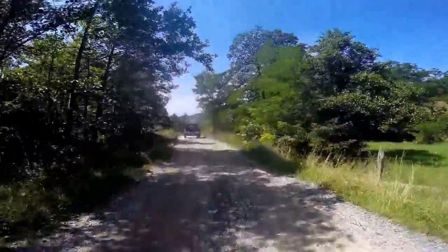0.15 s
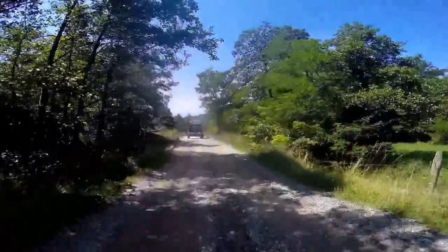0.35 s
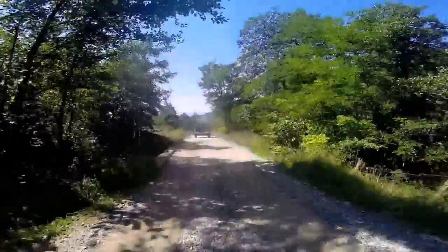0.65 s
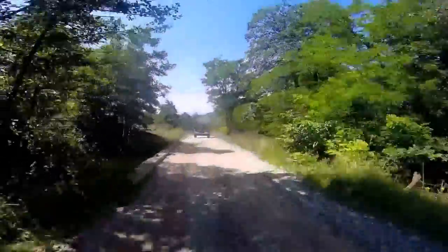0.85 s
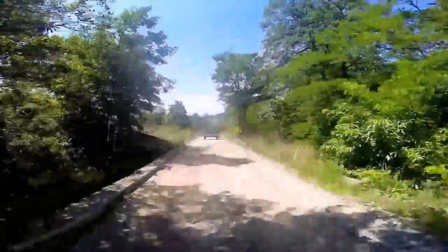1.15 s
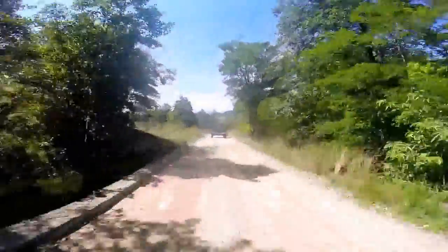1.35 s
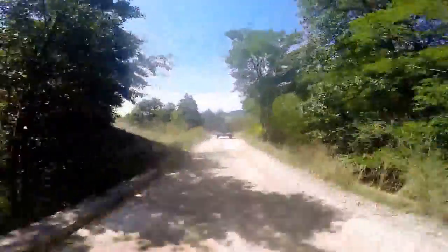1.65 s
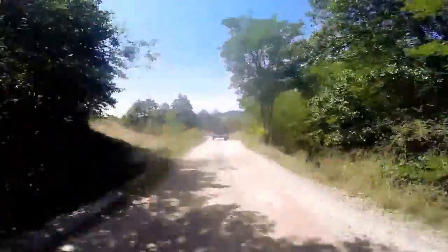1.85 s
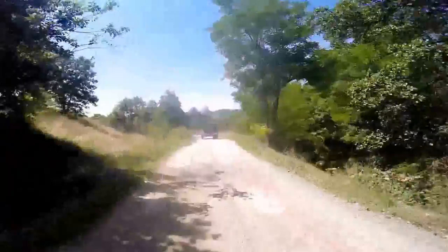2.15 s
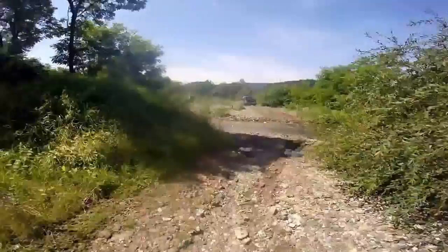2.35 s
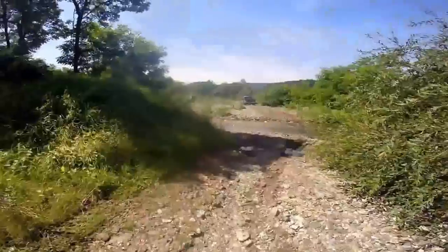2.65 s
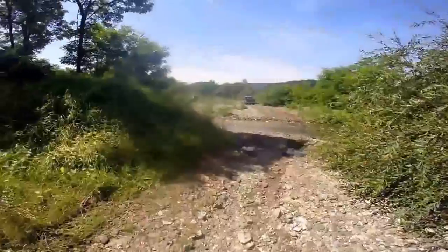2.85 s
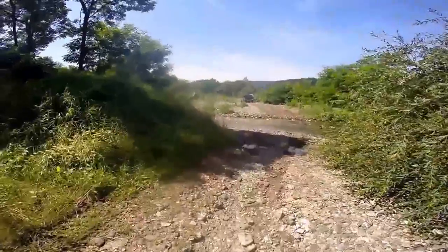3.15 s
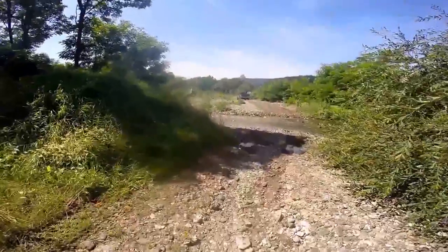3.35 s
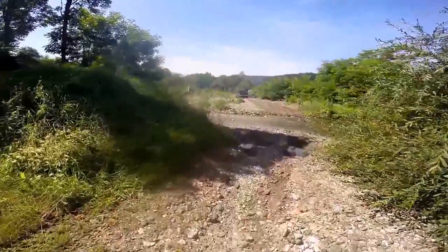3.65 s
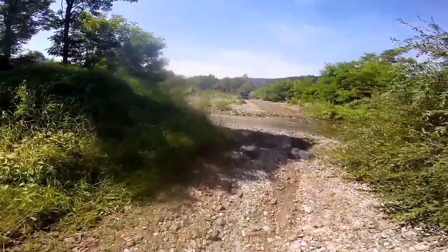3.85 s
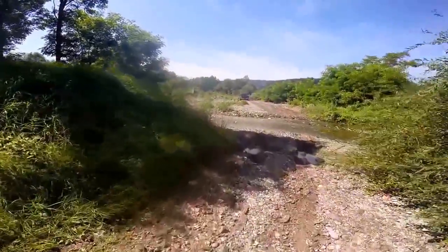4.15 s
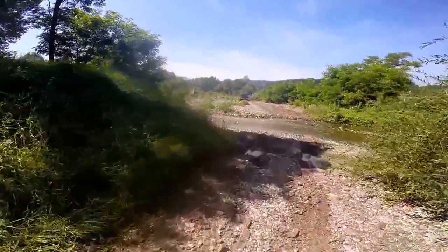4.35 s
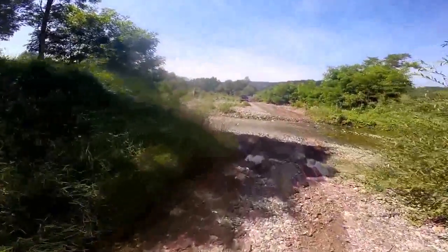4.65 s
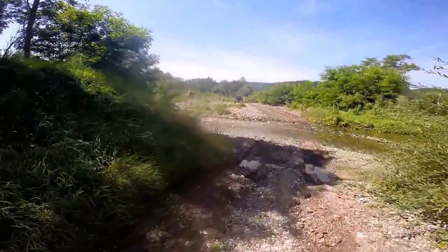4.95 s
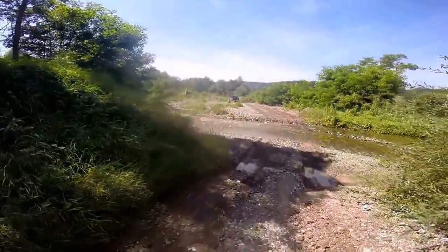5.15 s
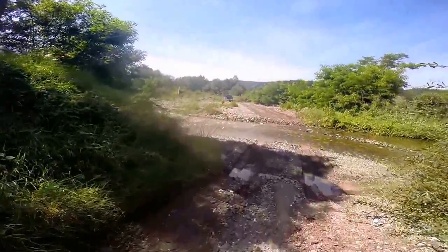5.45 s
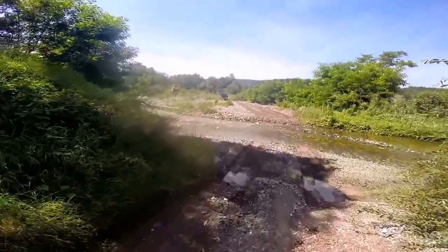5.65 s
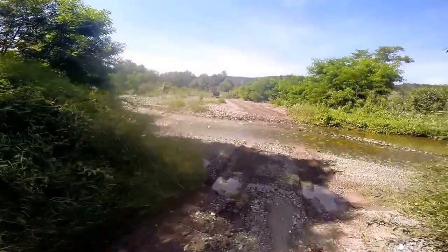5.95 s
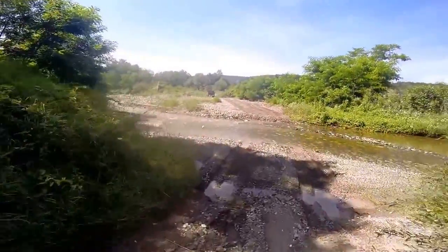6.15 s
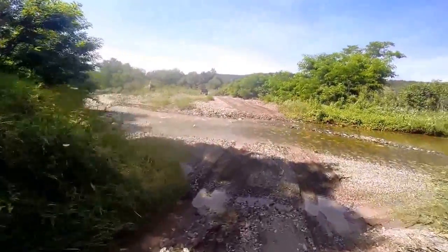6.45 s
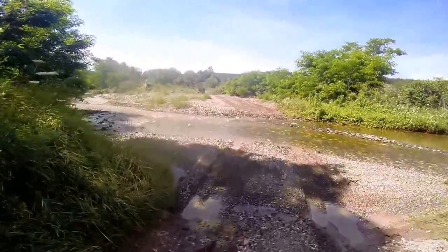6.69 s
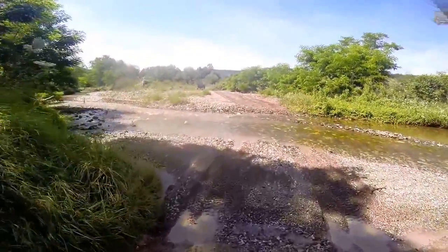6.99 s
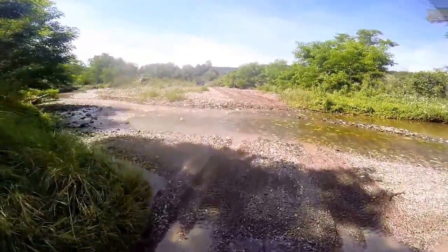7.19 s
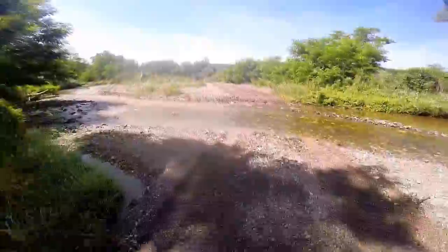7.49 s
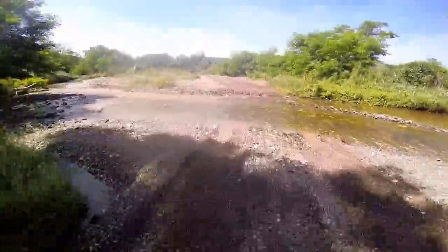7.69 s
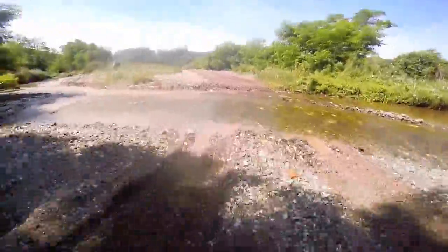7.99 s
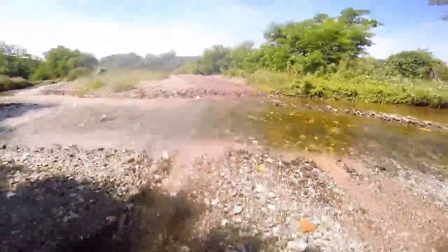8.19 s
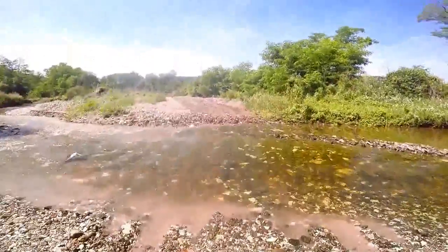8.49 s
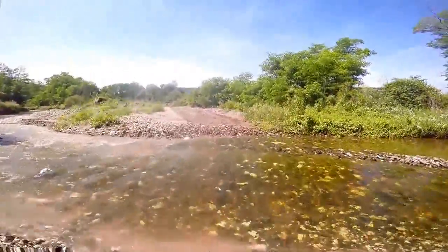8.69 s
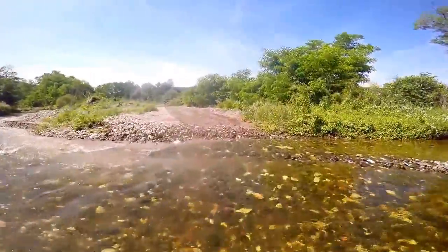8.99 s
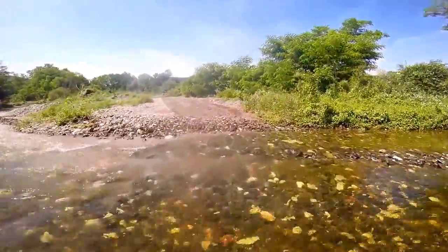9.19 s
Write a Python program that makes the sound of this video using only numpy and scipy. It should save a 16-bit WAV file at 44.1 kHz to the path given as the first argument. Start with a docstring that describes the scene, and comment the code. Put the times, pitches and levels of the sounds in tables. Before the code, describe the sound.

Close low engine drone, rumble and gravel crunch with clacking bumps, a tiny silent gap, a revving engine, slow throb and more knocks.

```python
"""On a stony dirt track, an off-road vehicle is heard from a hard case mounted on it.
Engine pulses make the exhaust and a panel boom, the crank shakes the frame and filtered noise is the valve clatter.
The tyres rumble and crunch on gravel; bumps and flying stones set off fading rings: knocks, clacks and clangs.
After a short silent break the engine revs up, drops to a throb down a slope, and pulls on towards a ford."""
import sys
import numpy as np
from scipy import signal
from scipy.fft import rfft, irfft, next_fast_len
from scipy.io import wavfile
from scipy.ndimage import uniform_filter1d, minimum_filter1d, map_coordinates

SR = 44100
rng = np.random.default_rng(int(sys.argv[2]) if len(sys.argv) > 2 else 0)


def pcm_store(signal):
    """Save signal as 16-bit PCM."""
    levels = np.round(np.clip(np.atleast_2d(signal), -1, 1) * 32767)
    wavfile.write(sys.argv[1], SR, levels.astype(np.int16).T)


N = 411453
BREAK_START_S, BREAK_END_S = 2.238, 2.304
USUAL_DB, USUAL_SHAKE_DB = -33.5, -24.5  # reference running level and frame shake


def amp(db):
    """Turn decibels into a plain multiplier."""
    return 10 ** (np.asarray(db) / 20)


def unit(x):
    """Scale x to an average strength (rms) of 1."""
    return x / np.sqrt(np.mean(x ** 2) + 1e-20)


def curves(rows):
    """One value per sample for each column after the time."""
    times, *columns = np.transpose(rows)
    return [np.interp(np.arange(N) / SR, times, column) for column in columns]


def wobble(rate):
    """A smooth random curve with `rate` random points a second."""
    points = rng.standard_normal(int(N * rate / SR) + 4)
    return map_coordinates(points, [np.arange(N) * rate / SR])


def filtered(x, response):
    """Multiply the spectrum of x by a response to frequency."""
    size = next_fast_len(N + SR // 2)
    spectrum = rfft(x, size) * response(np.fft.rfftfreq(size, 1 / SR))
    return irfft(spectrum, size)[:N]


def coloured(x, points):
    """Shape the tone of x by (frequency [Hz], level [dB]) points, at rms 1."""
    hz, db = np.transpose(points)
    return unit(filtered(x, lambda f: amp(np.interp(np.log(f + 1), np.log(hz), db))))


def resonate(x, modes):
    """Pass x through resonances (frequency [Hz], width [Hz], level [dB]), at rms 1."""
    def response(f):
        total = 0
        for k, (centre, width, db) in enumerate(modes):
            peak = 1j * f * width / (centre * centre - f * f + 1j * f * width)
            total = total + (-1) ** k * amp(db) * peak
        return total
    return unit(filtered(x, response))


def steady(x, span):
    """Even out the slow swells of x, averaging over `span` seconds, to rms 1."""
    power = uniform_filter1d(x * x, max(int(span * SR), 2))
    return x / np.sqrt(np.abs(power) + 1e-6)


def patchy(x, depth_db):
    """Each band of x flutters on its own, at rms 1."""
    bands = signal.stft(x, nperseg=256)[2]
    field = uniform_filter1d(rng.standard_normal(bands.shape), size=3, axis=0)
    field = unit(uniform_filter1d(field, size=7, axis=1))
    return unit(signal.istft(bands * amp(depth_db * field), nperseg=256)[1][:N])


def stones(rate, spread_db):
    """Random tiny impacts, `rate` a second, of widely varying size, at rms 1."""
    hits = rng.random(N) < rate / SR
    return unit(hits * rng.standard_normal(N) * amp(spread_db * rng.standard_normal(N)))


def ring(modes, t, chance, vary_db, detune, attack):
    """Fading tones of a struck part; each blow differs in strengths and pitches, and `attack` softens its start."""
    hz, db, t60 = np.transpose(modes)[:, :, None]
    size, shift = chance[:, :len(modes), None]
    level = amp(db + vary_db * size - 60 * t / t60)
    partials = level * np.sin(2 * np.pi * hz * (1 + detune * shift) * t)
    return partials.sum(axis=0) * (1 - np.exp(-(t / attack) ** 2))


def push(t, contact_s):
    """The force of one contact: a short push and a softer recoil."""
    u = t / contact_s
    return u ** 3 * (1 - u / 4) * np.exp(-u)


# the engine's speed: (time [s], crank speed [turns/s])
ENGINE_SPEED = [(0, 45.6), (.3, 44.6), (.6, 50), (1.7, 47.6), (2.24, 42.3), (2.32, 29.8), (2.6, 36.3),
                (2.85, 43.8), (3.2, 47.4), (3.55, 43.8), (3.8, 39.8), (4.1, 31), (4.55, 30.3), (4.9, 24.3),
                (5.9, 25), (6.55, 31.9), (7, 35.3), (7.33, 40.9), (7.85, 23.4), (8.35, 33.3), (8.85, 30.9),
                (9.33, 27.4)]


def crank_turns():
    """Adding up the engine speed gives the crank turns made so far."""
    return np.cumsum(curves(ENGINE_SPEED)[0]) / SR


# level of the running sound, heard in the clatter; it dips briefly near 0.9 s and 9.1 s and starts low after
# the break: # (time [s], level [dB])
RUNNING = [(0, -35), (.78, -30), (.88, -42.5), (1.1, -37), (1.6, -38), (2.23, -34), (2.3, -49.5),
           (3, -31.5), (3.6, -27.5), (4.2, -35), (5.2, -38.5), (6, -36), (7, -33), (7.35, -27.5),
           (8.08, -33.5), (8.92, -27), (9.06, -38), (9.33, -34.5)]


def extra_running():
    """How far the running sound is above its reference level, in dB."""
    return curves(RUNNING)[0] - USUAL_DB


# the ride: (time [s], rumble level, which also dips near 0.9 s and 9.1 s and starts low after the break [dB], #
# roughness of the ride [0-1])
RIDE = [(0, -23.5, 0.6), (.8, -29, 0.7), (.92, -32.5, 0.5), (1.55, -26.5, 0.9), (1.75, -20.5, 0.6),
        (2.22, -36, .85), (2.33, -53, 0.3), (2.58, -33.5, 0), (3.4, -23.5, 0.4), (3.85, -16, 0.5),
        (4.3, -27.5, 0.6), (5.2, -24.5, 0.4), (6.1, -25, 0.5), (6.85, -20.5, .22), (7.7, -17.5, 0.9),
        (8.2, -30.5, .45), (8.7, -18.5, 0.3), (8.97, -17.5, 0.6), (9.1, -34, 0.8), (9.33, -23.5, 0.6)]


def rumble_and_roughness():
    """The level of the rumble and the roughness of the ride over time."""
    return curves(RIDE)


# wheels dropping into ruts: (time at the deepest [s], half-length [s], swell [dB])
JOLTS = [(0.601, 0.18, 9.5), (3.899, 0.22, 4.5), (4.168, 0.22, 9), (4.462, 0.15, 10), (4.623, 0.18, 7.5),
         (5.141, 0.24, 4), (5.444, 0.095, 9), (5.784, 0.36, 5.5), (6.186, 0.15, 6), (6.48, 0.27, 5),
         (6.66, 0.19, 4.5), (6.97, 0.12, 5.5), (7.451, 0.054, 4.5), (8.124, 0.048, 8.5), (8.933, 0.14, 5.5)]


def jolt_swell():
    """Each drop into a rut makes the level swell and settle smoothly, in dB."""
    t = np.arange(N) / SR
    swell = np.zeros(N)
    for s, half_length, db in JOLTS:
        swell += db * np.maximum(1 - ((t - s) / half_length) ** 2, 0) ** 4
    return swell


# the frame's shaking before the jolts are added: (time [s], level [dB])
FRAME = [(0, -27), (.5, -22.5), (1, -32.5), (2.2, -25.5), (2.55, -38.5), (2.8, -29), (3.5, -24), (4.8, -17),
         (5.05, -10.5), (5.7, -14), (6.1, -18), (6.9, -18.5), (7.25, -23), (8.2, -22.5), (8.7, -26),
         (9.33, -21)]
JOLT_SHAKE = 0.67  # dB of frame shake per dB of jolt


def frame_shake_level():
    """The frame shakes more in each jolt."""
    return curves(FRAME)[0] + JOLT_SHAKE * jolt_swell()


# the crank's shaking tones: (multiple of crank speed [ratio], relative level [dB])
SHAKE = [(.5, -11.5), (1, -2.5), (1.5, -20.5), (3, -19), (4, -22.5)]
# the body on its springs: (frequency [Hz], width [Hz], relative level [dB])
SWAY = [(25.6, 13.1, 1), (45, 16.75, -1.5)]


def frame_shake(turns, shake_db):
    """The crank shakes the frame at multiples of its speed; a rough ride sways the body on its springs."""
    tones = 0
    for multiple, db in SHAKE:
        tone = np.sin(2 * np.pi * (multiple * turns + rng.random()))
        tones = tones + amp(db + 2.4 * wobble(11)) * tone
    sway = steady(resonate(rng.standard_normal(N), SWAY), span=0.09)
    sway_share = np.clip(rumble_and_roughness()[1], 0, 1) ** 3
    shake = np.sqrt(1 - sway_share) * unit(tones) + np.sqrt(sway_share) * sway
    return amp(shake_db + 1.4 * wobble(14)) * shake


def firings(turns, jitter, scatter_db, uneven_db):
    """One pulse per crank turn, alternately strong and weak, none quite alike."""
    k = np.arange(1, int(turns[-1]))
    chance = rng.standard_normal((len(k), 2))
    at = np.interp(k + jitter * chance[:, 0], turns, np.arange(N)).astype(int)
    strength = amp(scatter_db * chance[:, 1] + uneven_db * (-1) ** k)
    return unit(np.bincount(at, strength, N))


def firing_drive(turns):
    """Firing pulses mixed with ragged puffs of noise, which take over when the ride is rough."""
    pulses = firings(turns, jitter=0.012, scatter_db=2.2, uneven_db=1.2)
    puffs = unit(rng.standard_normal(N) * amp(6 * np.cos(2 * np.pi * turns)))
    ragged = np.clip(1.05 * np.clip(rumble_and_roughness()[1], 0, 1), .2, .8)
    return (1 - ragged) * pulses + ragged * puffs


# the exhaust's drone before the jolts are added: (time [s], resonance [Hz], level [dB])
DRONE = [(0, 118.2, -20.5), (.6, 135.7, -20), (.9, 133, -27.5), (1.1, 128.3, -21.5), (1.5, 127.4, -30),
         (1.9, 137, -18.5), (2.22, 131.3, -31), (2.33, 157, -37.5), (2.75, 155.8, -29.5),
         (3.1, 163.2, -20.5), (3.75, 163.4, -18.5), (4.15, 153.3, -25.5), (4.8, 151.7, -23),
         (5.4, 150, -29.5), (6.1, 145, -24), (6.6, 157.5, -22), (7.2, 170.7, -22.5), (7.5, 152, -22),
         (7.8, 135.2, -19), (8.25, 164.6, -21.5), (8.75, 145, -26), (8.95, 132.5, -24.5),
         (9.08, 139, -32.5), (9.33, 133.2, -26)]
DRONE_WIDTH_HZ = 24
JOLT_DRONE = 0.85  # dB of drone per dB of jolt


def exhaust_drone(drive):
    """The firings ring a sliding exhaust resonance, blended from fixed neighbours."""
    centre_hz, level_db = curves(DRONE)
    bank, step = np.linspace(110, 185, 6, retstep=True)
    blend = np.zeros(N)
    for hz in bank:
        share = np.maximum(1 - np.abs(centre_hz - hz) / step, 0)
        blend += share * resonate(drive, [(hz, DRONE_WIDTH_HZ, 0)])
    skirt = [(50, -10.0), (120, 0.5), (190, 2.0), (300, -16.0), (600, -43.0)]
    drone = steady(coloured(blend, skirt), span=0.076)
    return amp(level_db + JOLT_DRONE * jolt_swell() + 1.8 * wobble(10)) * drone


# the panel's resonance: (frequency [Hz], width [Hz], relative level [dB])
PANEL = [(231.4, 22.6, 0)]
PANEL_DB, PANEL_PER_RUNNING = -27.5, 1.07  # level at the reference; dB per dB of running level


def panel_boom(drive):
    """The firings ring a body panel, whose boom follows the running level."""
    skirt = [(110, -9.0), (200, 9.5), (250, -5.5), (320, -7.5), (700, -44.0)]
    boom = steady(coloured(resonate(drive, PANEL), skirt), span=0.092)
    return amp(PANEL_DB + PANEL_PER_RUNNING * extra_running() + 1.8 * wobble(10)) * boom


# the tone of the clatter: (frequency [Hz], relative level [dB])
CLATTER = [(150, -22.5), (260, -1), (350, 7), (430, 1), (520, -5.5), (620, 1.5), (710, 2), (755, -5.5),
           (830, -5), (1080, -9), (1400, -14.5), (1850, -20), (2200, -38), (9000, -96)]
# covers that the clatter rings: (frequency [Hz], width [Hz], relative level [dB])
COVERS = [(348, 200, -5.5), (653, 7.2, -5), (676, 3.4, 0.5), (930, 18, -7.5), (1054, 51, -1)]


def valve_clatter(turns, drive):
    """Noise and taps swell once a crank turn, joined by the firings, and ring the covers."""
    beat = amp(1 * np.cos(2 * np.pi * turns) + 1.7 * wobble(30))
    # the valve gear repeats its pattern of taps every two turns
    pattern = rng.standard_normal(size=400)
    valves = unit(map_coordinates(pattern, [(turns / 2 % 1) * 400], mode="wrap"))
    taps = rng.standard_normal(N) + 0.26 * stones(rate=210, spread_db=2.5) + 0.32 * valves
    clatter = coloured(beat * taps + 0.54 * drive, CLATTER)
    clatter = patchy(clatter + 0.4 * resonate(clatter, COVERS), depth_db=1.5)
    return amp(curves(RUNNING)[0]) * clatter


def engine(turns, shake_db):
    """The crank shakes the frame; the firings drive exhaust, panel and part of the clatter."""
    drive = firing_drive(turns)
    low = frame_shake(turns, shake_db) + exhaust_drone(drive) + panel_boom(drive)
    return low + valve_clatter(turns, drive)


# the tone of the rumble from ruts: (frequency [Hz], relative level [dB])
RUMBLE = [(10, -15.5), (22, -11), (50, -2), (100, -5.5), (150, -1.5), (240, -13), (400, -55.5), (900, -100)]


def chassis_rumble(turns):
    """Ruts rumble as low noise; when the ride is smooth a buzz at twice the crank speed replaces them."""
    rumble_db, rough = rumble_and_roughness()
    ruts = steady(coloured(rng.standard_normal(N), RUMBLE), span=0.17)
    buzz = unit(amp(0.99 * wobble(21)) * np.sin(2 * np.pi * 2 * turns))
    smooth = np.clip(1 - 2.1 * rough, 0, 1)
    rutted = 1.08 * np.sqrt(1 - smooth) * amp(0.46 * wobble(7.4)) * ruts
    return amp(rumble_db + jolt_swell()) * (np.sqrt(smooth) * buzz + rutted)


# the tone of the gravel: (frequency [Hz], relative level [dB])
GRAVEL = [(600, -24.5), (1800, 11.5), (3000, -7), (4000, -4.5), (4500, -9.5), (6000, -11.5), (7000, -18.5),
          (8100, -16.5), (9000, -26), (15500, -44.5)]
# the case colours the hiss: (frequency [Hz], width [Hz], relative level [dB])
CASE = [(2518, 80, -1.5), (3140, 230, -12.5), (3900, 82, -11.5)]
PACKED_DB, LOOSE_DB, BANK_DB = -57.5, -53, -55  # reference gravel: packed track, loose slope, river bank
BANK_FROM_S = 6.7
GRAVEL_PER_RUNNING, GRAVEL_PER_SHAKE = 0.74, 0.21  # dB per dB


def gravel_crunch(turns):
    """Grit hisses and ticks under the tyres, louder on loose ground and with running level and frame shake."""
    surface_db, = curves([(BREAK_START_S, PACKED_DB), (BREAK_END_S, LOOSE_DB)])
    surface_db[np.arange(N) / SR >= BANK_FROM_S] = BANK_DB
    extra_shake = curves(FRAME)[0] - USUAL_SHAKE_DB  # jolts left out
    gravel_db = surface_db + GRAVEL_PER_RUNNING * extra_running() + GRAVEL_PER_SHAKE * extra_shake
    beat = amp(2 * np.cos(2 * np.pi * turns) + 1.5 * wobble(13))
    grit = (rng.standard_normal(N) + 0.47 * stones(rate=500, spread_db=2.5)) * beat
    # shuffling the grit's samples makes a separate hiss for the case
    case_hiss = amp(0.8 * wobble(30)) * resonate(rng.permutation(grit), CASE)
    return amp(gravel_db) * patchy(coloured(grit, GRAVEL) + 0.47 * case_hiss, depth_db=1.5)


# a loose fitting's ring: (frequency [Hz], relative level [dB], time to fade 60 dB [s])
FITTING = [(1890, -1.5, 0.032), (2466, 7.5, 0.04), (3150, -6.5, 0.095), (3980, -9.5, 0.033)]
# shakes that make the fitting jump: (time [s], level [dB])
JINGLES = [(5.743, -47), (9.152, -45), (9.217, -45.5)]
RATTLE_DB, RATTLE_PER_RUNNING, RATTLE_PER_SHAKE = -89.5, 0.38, 0.43  # blows at the reference; dB per dB


def rattle(turns, shake_db):
    """Firings ring a loose fitting, louder with running level and frame shake; now and then it jumps."""
    out, t = np.zeros(N + SR), np.arange(SR // 10) / SR
    level_db = RATTLE_DB + RATTLE_PER_RUNNING * extra_running()
    level_db = level_db + RATTLE_PER_SHAKE * (shake_db - USUAL_SHAKE_DB)
    blows = amp(level_db) * firings(turns, jitter=0.074, scatter_db=2.8, uneven_db=1.5)
    for s, db in JINGLES:
        blows[round(s * SR)] = amp(db)
    for at in np.flatnonzero(blows):
        chance = rng.standard_normal((2, len(FITTING)))
        jingle = ring(FITTING, t, chance, vary_db=2.5, detune=0.008, attack=0.0014)
        out[at:][:len(t)] += blows[at] * jingle
    return out[:N]


# blows that ring one part of the metalwork: (time [s], level [dB], frequency [Hz])
PINGS = [(0.127, -23, 3980), (2.2219, -13.5, 369), (7.562, -22.5, 3980), (7.622, -25.5, 3948),
         (7.8083, -14, 1690), (7.8103, -17, 2030)]
PING_CYCLES = 28  # cycles in which a ring fades by 60 dB


def pings():
    """A blow sets one part of the metalwork ringing for a moment; low notes last longer."""
    out, t = np.zeros(N + SR), np.arange(SR // 8) / SR
    for s, db, hz in PINGS:
        level = amp(db - 60 * t * hz / PING_CYCLES) * (1 - np.exp(-t / 0.00089))
        out[round(s * SR):][:len(t)] += level * np.sin(2 * np.pi * hz * t)
    return out[:N]


# the tone of a scrape: (frequency [Hz], relative level [dB])
SCRAPE = [(300, 4.5), (900, 14), (1700, 5.5), (2300, -1), (4100, -24.5), (4600, -19.5), (7000, -37),
          (14000, -51.5)]


def friction_noise():
    """Rubbing surfaces make a rough noise."""
    return coloured(rng.standard_normal(N), SCRAPE)


# hard bumps: (time [s], clack, thud and scrape levels before each part's own gain [dB])
KNOCKS = [(0.128, -38, -34, -24), (0.2017, -44, -21.5, -31), (0.345, -37.5, -24, -33),
          (.62, -46, -15.5, -21), (0.733, -46, -21, -27), (0.741, -48.5, -14.5, -25.5),
          (0.7707, -22, -11.5, -26), (0.7988, -56, -15, -40), (0.8172, -36, -31, -30.5),
          (0.8295, -30, -16, -31), (1.054, -30.5, -36, -24), (1.0668, -37.5, -20.5, -20.5),
          (1.1151, -41, -24.5, -22), (1.1311, -29.5, -16.5, -24), (1.3364, -23.5, -16.5, -36),
          (1.402, -48.5, -22.5, -30), (1.472, -25.5, -15.5, -36.5), (1.8096, -52.5, -15, -32),
          (1.8314, -33.5, -24, -13.5), (1.9212, -22.5, -15.5, -37.5), (1.9946, -28.5, -16, -20),
          (2.027, -42, -14, -27), (2.1518, -19.5, -15, -33), (2.221, -30.5, -20.5, -30),
          (7.558, -55, -36, -14.5), (7.6189, -42.5, -26, -17), (7.8041, -54.5, -11.5, -32),
          (7.8099, -36.5, -21.5, -11), (7.8796, -50.5, -21.5, -41), (7.913, -47, -24.5, -25),
          (7.92, -36, -12, -17), (7.952, -59.5, -16.5, -38), (8.122, -48, -27.5, -39),
          (8.994, -20, -14.5, -27.5), (9.0458, -31, -19.5, -42.5)]
# the mount's dull ring: (frequency [Hz], relative level [dB], time to fade 60 dB [s])
THUD = [(338, 2, 0.028), (405, 3.5, 0.027), (510, 3, .02), (656, -6, 0.032), (808, -12, 0.025),
        (946, -14, 0.015)]
# the case's hard ring: (frequency [Hz], relative level [dB], time to fade 60 dB [s])
CLACK = [(1783, 3.5, 0.022), (2160, -7, 0.035), (2460, 4.5, 0.02), (2700, 5, 0.021), (3140, -5, 0.025),
         (3770, 5.5, 0.0097), (3905, -3, 0.009), (4520, -3.5, 0.011), (5700, -9.5, 0.013),
         (6700, -26, 0.0084), (7950, -16, 0.013), (10500, -17, 0.0022), (13300, -25.5, .002)]
CRACK_HZ = (2200, 7800)  # band of the dry crack before the case rings


def knocks():
    """At each bump the loose mount thuds and the case cracks, rings and scrapes; harder clacks push shorter."""
    out, t = np.zeros(N + SR), np.arange(SR // 8) / SR
    friction = friction_noise()
    crack_filter = signal.butter(2, CRACK_HZ, "bandpass", fs=SR)
    for s, clack_db, thud_db, scrape_db in KNOCKS + chatter():
        at = round(s * SR)
        chance = rng.standard_normal((2, 2, len(CLACK) + len(THUD)))
        contact_s = 0.00033 * amp(-0.09 * clack_db)
        dull_ring = ring(THUD, t, chance[0], vary_db=5.0, detune=0.054, attack=0.0025)
        thud = amp(thud_db + 17.0) * push(t, contact_s) + amp(thud_db + 2.5) * dull_ring
        clack = ring(CLACK, t, chance[1], vary_db=3.2, detune=0.016, attack=0.00028)
        crack_noise = signal.lfilter(*crack_filter, rng.standard_normal(len(t)))
        crack = amp(1.5 - 60 * t / 0.0049) * crack_noise
        scrape_level = amp(scrape_db - 60 * t / 0.022) * (1 - np.exp(-t / 0.0011))
        scrape = scrape_level * np.roll(friction, -at)[:len(t)]
        out[at:][:len(t)] += thud + amp(clack_db - 5.0) * (clack + crack) + scrape
    return out[:N]


# stones striking the underside: (time [s], level [dB])
STRIKES = [(.128, -33), (.619, -32.5), (1.833, -19), (6.6282, -26.5), (7.8099, -30.5)]
# the underside's ring: (frequency [Hz], relative level [dB], time to fade 60 dB [s])
PLATE = [(682, 6, 0.026), (820, 3.5, 0.045), (1020, -7.5, 0.041), (2484, -1.5, 0.025), (3180, -5, 0.026),
         (3710, 2, 0.011), (3930, -4.5, .02), (4320, -8.5, 0.018), (5850, -10.5, 0.011), (6600, -17, .011)]
SKIP_S, SKIP_LOSS_DB = .014, 17  # the second contact: delay and loss


def strikes():
    """A stone hits the underside, which clangs, and skips once more softly."""
    out, t = np.zeros(N + SR), np.arange(SR // 8) / SR
    for s, db in STRIKES:
        for delay, loss_db in [(0, 0), (SKIP_S, SKIP_LOSS_DB)]:
            chance = rng.standard_normal((2, len(PLATE)))
            clang = ring(PLATE, t, chance, vary_db=1.0, detune=0.0085, attack=0.00035)
            out[round((s + delay) * SR):][:len(t)] += amp(db - loss_db) * clang
    return out[:N]


# the mount falls back on its padded stop: (time [s], relative level [dB])
REBOUNDS = [(.749, 4), (2.0445, -1.5), (2.1205, -1.5), (7.9317, -2.5), (8.003, -3.5)]


def rebounds():
    """The padded stop takes the blow the other way: one dry, dull knock with a little scuff."""
    out, t = np.zeros(N + SR), np.arange(SR // 8) / SR
    friction = friction_noise()
    for s, db in REBOUNDS:
        at = round(s * SR)
        scuff_level = amp(-21.5 - 60 * t / 0.018) * (1 - np.exp(-(t / 0.001) ** 2))
        scuff = scuff_level * friction[at:][:len(t)]
        out[at:][:len(t)] += amp(db) * (scuff - 1.7 * push(t, 0.00037))
    return out[:N]


# spells of humming, each a list of rows: (time [s], frequency [Hz], level [dB])
HUM = [
    [(1.6, 218.4, -26), (2.2, 205.3, -35.5)],
    [(2.46, 150.3, -37), (2.64, 202.2, -28.5), (2.85, 230, -27.5), (3.1, 242.4, -30), (3.55, 232.4, -18.5),
     (3.8, 218.4, -19)],
    [(7.18, 224.7, -23), (7.28, 236.2, -20.5), (7.45, 225.4, -29)],
    [(8.25, 231, -24.5), (8.55, 234, -21.5), (8.9, 231, -18.5), (9.1, 230.2, -35.5), (9.3, 232, -21)],
]
HUM_FADE_S = 0.072


def hum():
    """The drive line sings unsteadily in the panel, fading in and out of each spell."""
    t, out = np.arange(N) / SR, np.zeros(N)
    flutter = amp(2 * wobble(12) + 1.8 * wobble(70))
    drift_hz = 1.8 * wobble(16)
    for spell in HUM:
        hz, db = curves(spell)
        outside_s = np.maximum(spell[0][0] - t, t - spell[-1][0])
        fade = np.clip(1 - outside_s / HUM_FADE_S, 0, 1)
        tone = unit(flutter * np.sin(2 * np.pi * np.cumsum(hz + drift_hz) / SR))
        out += amp(db) * fade * tone
    return out


# short moments with one or a few light knocks of the mount:
# (start [s], end [s], thud level before gain [dB])
CHATTER = [(1.891, 1.9, -19), (1.953, 1.965, -21.5), (2.077, 2.11, -28), (2.185, 2.2, -22),
           (7.844, 7.87, -28), (7.959, 8.0, -17.5), (9.09, 9.23, -34)]
CHATTER_GAP_S, CHATTER_SPREAD_DB = 0.02, 0.5  # mean time between light knocks; scatter of their strength
CHATTER_CLACK_DB, CHATTER_SCRAPE_DB = -63.5, -37  # as in the rows of the hard bumps


def chatter():
    """One or a few light, unevenly spaced knocks in each short moment, as rows like those of the hard bumps."""
    rows = []
    for start, end, thud_db in CHATTER:
        gaps = CHATTER_GAP_S * (.5 + rng.random(size=32))
        sizes = CHATTER_SPREAD_DB * rng.standard_normal(size=32)
        times = start + np.cumsum(gaps) - gaps[0]
        for s, db in zip(times, sizes):
            if s < end:
                rows.append((s, CHATTER_CLACK_DB + db, thud_db + db, CHATTER_SCRAPE_DB + db))
    return rows


def scene():
    """Add up the engine, the tyres, the rattle, the knocks and the stones."""
    turns = crank_turns()
    shake_db = frame_shake_level()
    running = engine(turns, shake_db) + chassis_rumble(turns) + gravel_crunch(turns) + hum()
    blows = rattle(turns, shake_db) + pings() + knocks() + strikes() + rebounds()
    return (running + blows)[None]


TOP_HZ = 15750  # nothing is heard above this


def record(dry):
    """A fast limiter tames the peaks, the sound breaks off briefly, and the top treble is cut."""
    t = np.arange(N) / SR
    needed = np.minimum(1, .97 / (np.abs(dry[0]) + 1e-9))
    gain = uniform_filter1d(minimum_filter1d(needed, size=129), size=129)
    before = (t > .004) & (t < BREAK_START_S)
    after = (t > BREAK_END_S) & (t < t[-1] - .004)
    fade = uniform_filter1d(1.0 * (before | after), size=160)
    return filtered(dry[0] * gain * fade, lambda hz: hz < TOP_HZ)[None]


dry = scene()
out = record(dry)
pcm_store(out)
```